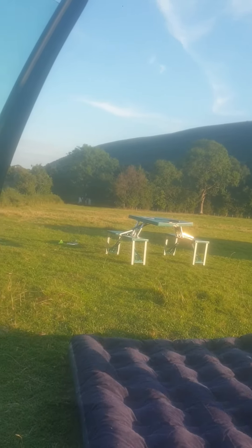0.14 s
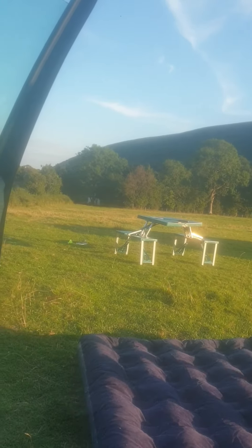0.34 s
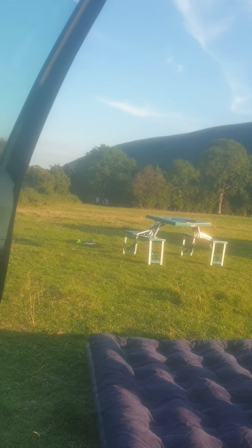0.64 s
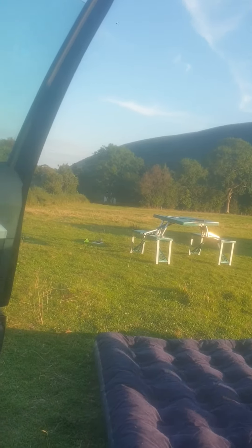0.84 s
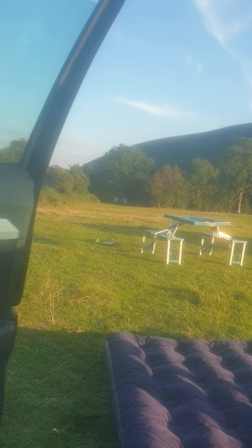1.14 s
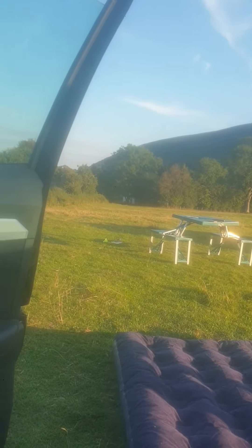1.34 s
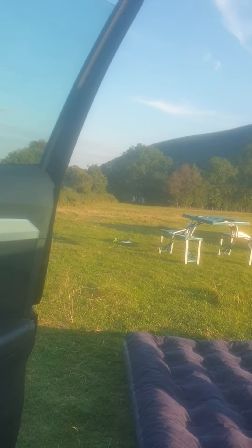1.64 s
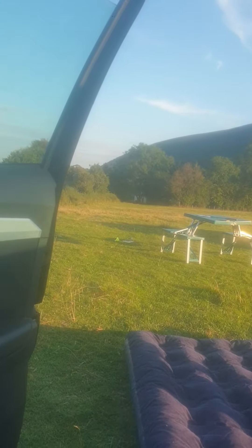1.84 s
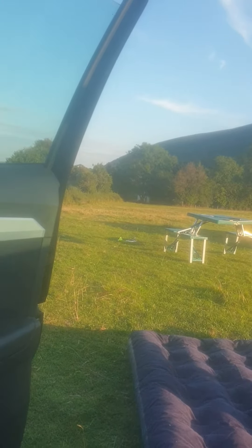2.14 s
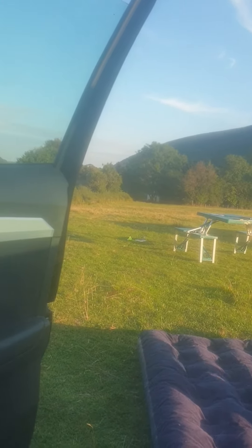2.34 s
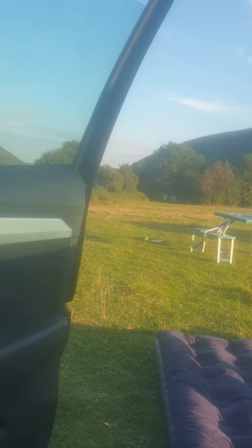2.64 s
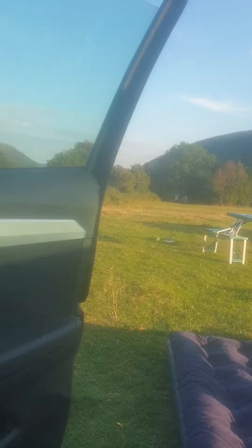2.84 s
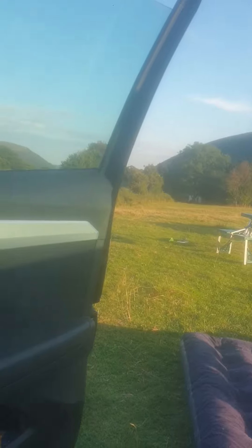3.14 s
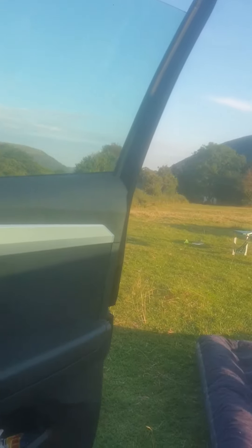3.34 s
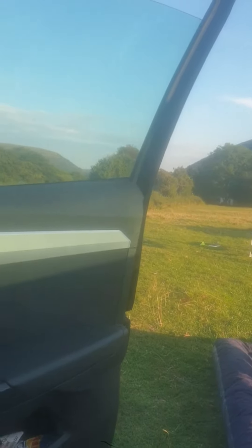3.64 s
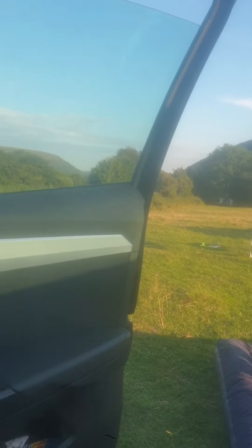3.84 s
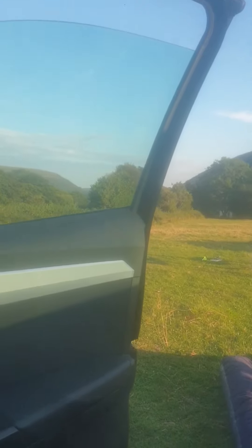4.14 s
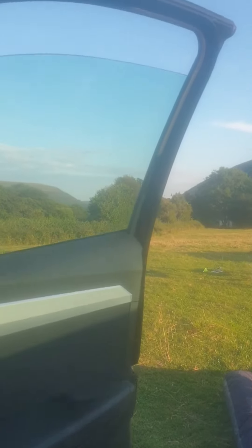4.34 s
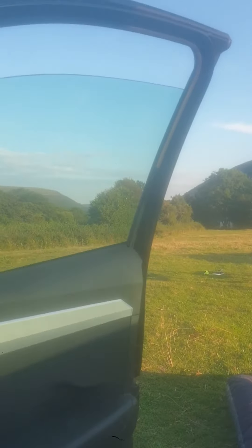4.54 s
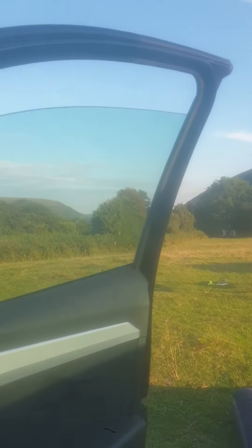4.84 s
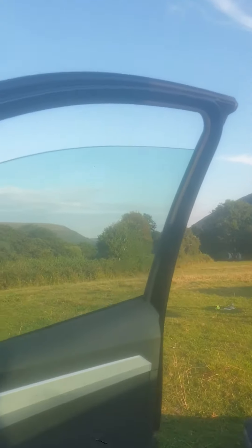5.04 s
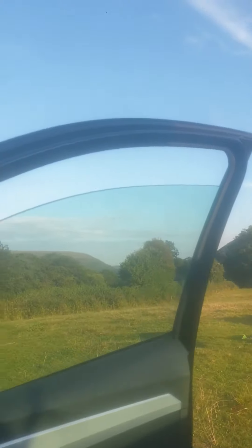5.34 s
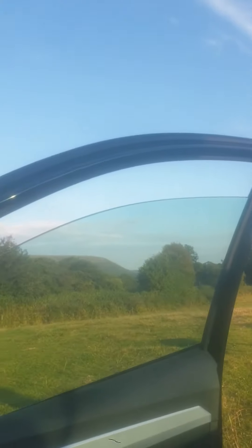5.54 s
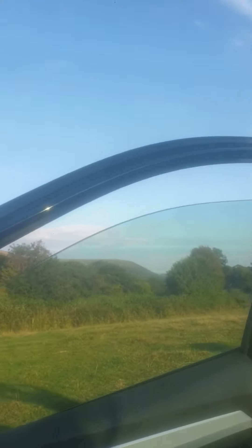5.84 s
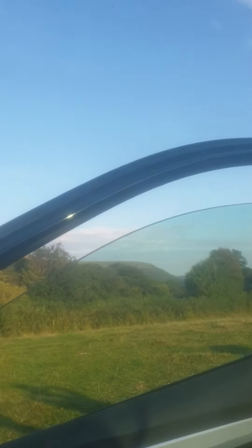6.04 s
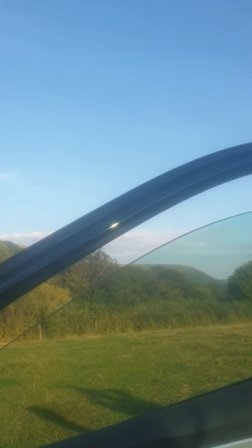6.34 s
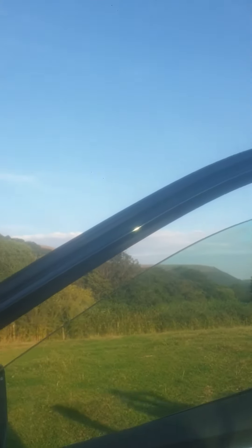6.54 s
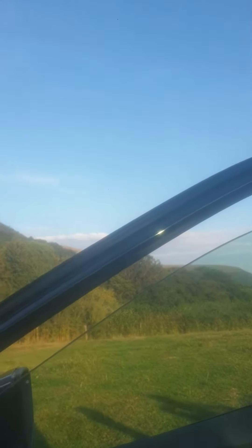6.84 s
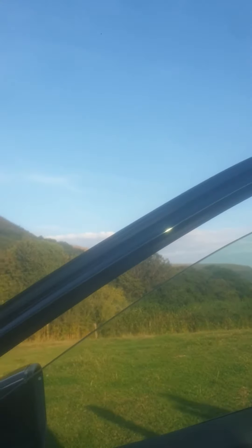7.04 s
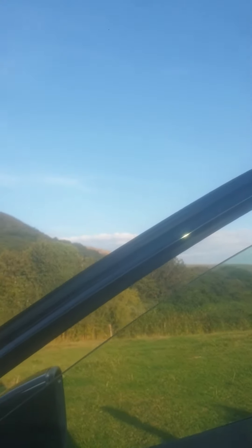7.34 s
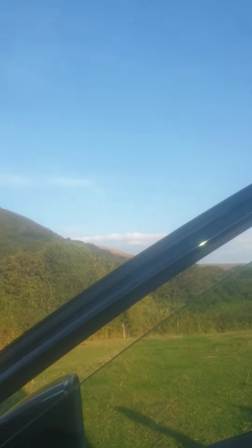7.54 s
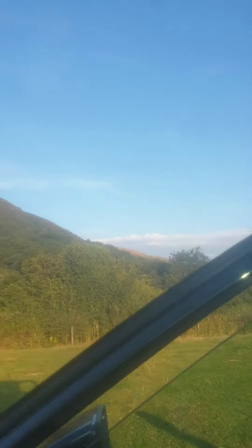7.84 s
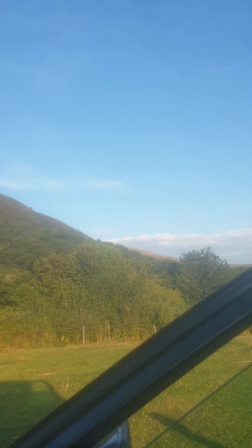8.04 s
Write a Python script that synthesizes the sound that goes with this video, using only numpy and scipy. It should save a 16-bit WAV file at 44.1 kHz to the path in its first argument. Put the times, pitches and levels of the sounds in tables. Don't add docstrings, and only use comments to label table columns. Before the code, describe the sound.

Continuous harsh droning of a mattress air pump in a meadow, rattling and whining, its colour changing halfway while air hisses.

```python
import sys
import numpy as np
from scipy import signal
from scipy.fft import rfft, irfft, next_fast_len
from scipy.io import wavfile
from scipy.ndimage import uniform_filter1d, map_coordinates

SR = 44100
rng = np.random.default_rng(int(sys.argv[2]) if len(sys.argv) > 2 else 0)


def gain_from_db(level_db):
    decades = np.asarray(level_db, float) / 20
    return 10 ** decades


def wrap_up_sound(samples):
    columns = np.atleast_2d(samples).T
    tamed = np.clip(columns, -1, 1)
    steps = np.round(tamed * 32767).astype(np.int16)
    wavfile.write(sys.argv[1], SR, steps)


N = 361179
T = np.arange(N) / SR
WHEEL, PINION = 82, 18
POSES = np.linspace(0, 3.5, 29)
ORDERS = np.arange(1, 201)


def unit(x):
    return x / np.sqrt(np.mean(x ** 2) + 1e-20)


def curves(rows):
    s, *cols = np.transpose(rows)
    return [np.interp(T, s, c) for c in cols]


def wobble(rate):
    knots = rng.standard_normal(int(N * rate / SR) + 4)
    coarse = T[::32]
    return unit(np.interp(T, coarse, map_coordinates(knots, [coarse * rate])))


def per_port(left_db, right_db):
    return gain_from_db([[left_db], [right_db]])


def pump():
    heading, delay_ms = phone_turn()
    turns = crank_turns()
    strokes = valve_strokes(turns, heading)
    turns = turns - np.array([[.016], [0]])
    bite = 2 * np.pi * (turns - .8) + 0.0032 * wobble(40)
    echoed = strokes + np.sqrt(2) * motor(turns) + air_noise(turns, heading)
    gears = np.sqrt(2) * (tooth_mesh(bite, heading) + high_whine(turns))
    return door(echoed, heading, delay_ms) + gears + hose_hiss(bite, heading)


# (time [s], heading [-], door echo delay [ms])
PHONE_TURN = [
    (0, 0, 2.57),
    (3.4, -0.12, 2.69),
    (4, 0.44, 2.48),
    (4.5, 0.3, 2.43),
    (4.95, 1, 2.31),
    (5.6, 1.24, 2.32),
    (6.2, 1.8, 2.227),
    (7, 2, 2.16),
    (7.6, 2.5, 2.17),
    (8.19, 3.5, 1.87),
]


def phone_turn():
    return curves(PHONE_TURN)


# (time [s], crank turns per second [Hz])
CRANK_SPEED = [(0, 84.5), (.45, 84.62), (.75, 84.4), (1.02, 84.57), (1.4, 84.29), (1.8, 84.5), (2.3, 84.36),
               (2.78, 84.3), (3.02, 84.46), (4, 84.49), (4.25, 84.38), (4.8, 84.36), (5.12, 84.47),
               (5.8, 84.24), (6.15, 84.39), (6.65, 84.44), (7.1, 84.32), (7.6, 84.46)]


def crank_turns():
    crank_hz, = curves(CRANK_SPEED)
    return np.cumsum(crank_hz + .05 * wobble(20)) / SR + 0.05 + .0008 * wobble(70)


def valve_strokes(turns, heading):
    pose = np.interp(heading, POSES, np.arange(len(POSES)))
    place = [pose, turns % 1 * 4096]
    strokes = [map_coordinates(port, place, order=1, mode="grid-wrap") for port in cycles()]
    return np.array(strokes) * gain_from_db(0.08 * wobble(84))


def cycles():
    phase = arrival_phase()
    lag = port_lag()
    lines = gain_from_db(order_levels() + field_spots()) * np.exp(1j * (phase + np.array([0 * lag, lag])))
    return irfft(np.pad(lines, ((0, 0), (0, 0), (1, 0))), 4096) * 4096 / np.sqrt(2)


STROKE_ARRIVAL = [(1.5, -.06), (2.5, 0), (3.5, -.26), (4.5, -.3), (5.5, .24), (6.5, .31), (7.5, .11),
                  (8.6, .3), (9.6, .33), (10.5, .6), (11.5, .28), (14, .07), (20, .42)]


def arrival_phase():
    k, heading = ORDERS, POSES[:, None]
    at, share = np.transpose(STROKE_ARRIVAL)
    spread = 0.26 * np.clip((k - 14) / 6, 0, 1) * (1 + (k > 33)) * rng.uniform(-1, 1, 200)
    twist = 0.46 * heading * np.clip((k - 6) / 2, 0, 1)
    return np.pi - 2 * np.pi * np.cumsum(np.interp(k - .5, at, share) + spread) - twist


PORT_LAG = [(1, 0), (5, 0.25), (13, 1.32), (20, 4), (23.4, 3), (25, 1.5), (30, 0.73), (38, -2.5),
            (49, 1.76)]


def port_lag():
    k, heading = ORDERS, POSES[:, None]
    oppose_rad, oppose_share = 3.3, .55
    lag = np.where(k < 50, np.interp(k, *np.transpose(PORT_LAG)), rng.uniform(0, 2 * np.pi, 200))
    turned_away = np.clip(heading - .9, 0, 1) * (heading < 2.9) * (k > 18) * (k < 33)
    return lag + (oppose_rad - lag) * oppose_share * turned_away


# (crank multiple
# [-], facing left [dB], facing right [dB], away left [dB], away right [dB])
STRONG_ORDERS = [(1, -32.5, -35, -34, -36.5), (2, -29.5, -32.5, -31.5, -34.5), (3, -53.5, -61, -48.5, -52),
                 (4, -44, -44.5, -42.5, -49.5), (5, -32, -33.5, -40.5, -40.5), (6, -19.5, -25, -24.5, -27),
                 (7, -20, -32.5, -23, -26), (8, -30, -30, -29, -39), (9, -32.5, -37, -35, -37.5),
                 (10, -28, -35, -33.5, -35), (11, -29.5, -37, -29, -35.5), (12, -31.5, -31, -28, -39),
                 (13, -28, -33, -27, -33), (14, -40, -43, -32, -40.5),
                 (15, -32.5, -38, -35.5, -37), (20, -42.5, -40, -37.5, -43), (21, -44.5, -38, -38.5, -44.5),
          (22, -46, -44.5, -32, -39), (23, -41, -33.5, -45, -34), (25, -31, -31.5, -47, -41),
          (26, -40, -47.5, -57.5, -51.5), (28, -51, -41, -37, -43), (29, -42, -46, -43, -35.5),
          (30, -35.5, -41, -43, -49), (34, -44, -44, -44, -48), (38, -42, -48, -40.5, -55),
          (41, -51, -51.5, -45, -52), (49, -38, -48, -46, -54)]
# (crank multiple [-], left level [dB], right level [dB])
RATTLE_LEVELS = [(15, -44, -45.5), (19.2, -43.5, -54), (27, -62, -47.5), (32.3, -58.5, -48),
                 (36.8, -55.5, -58), (56.2, -57.5, -63), (59.3, -61, -69.5), (196, -90.5, -99)]


def order_levels():
    heading = POSES[:, None]
    scatter_db, reshuffle_db = 2.5, 4
    at, *rattle = np.transpose(RATTLE_LEVELS)
    drift = uniform_filter1d(rng.standard_normal((2, len(POSES), 200)), size=5, axis=1)
    db = np.array([np.interp(ORDERS, at, r) for r in rattle])[:, None]
    db = db + scatter_db * rng.standard_normal((2, 1, 200)) + reshuffle_db * unit(drift)
    at, *sides = np.transpose(STRONG_ORDERS)
    facing, away = np.reshape(sides, (2, 2, 1, -1))
    db[..., np.round(at).astype(int) - 1] = facing + (away - facing) * np.clip(heading / 2, 0, 1)
    return db


# (heading [-], centre [Hz], width [Hz], left gain [dB], right gain [dB])
FIELD_SPOTS = [(0.88, 338, 35, -23, -16), (1.55, 338, 40, -4, -18), (.6, 590, 44, 3, 4),
               (1.1, 1006, 90, -9, 0), (0.8, 1100, 60, 2, 7), (1.6, 1150, 220, -6.5, -5),
               (3.2, 460, 86, -9, -7), (3.22, 338, 51, 6.5, 9.5), (3, 700, 70, 6, 0),
               (3.07, 1040, 140, -6, 6), (0.62, 2590, 160, -9, 10), (3.2, 2400, 50, 10, -7),
               (1.2, 1940, 58, 9.5, 0), (1.2, 3380, 230, 4, -6), (1.9, 3460, 50, 8, -6),
               (2.3, 2600, 40, 8, -10), (0.67, 4600, 150, 6, 14), (3.24, 4540, 380, 10.5, 11),
               (1.75, 4140, 40, 11, 0), (2.2, 4140, 40, 3, 0), (.7, 4140, 40, -6, -3),
               (3.2, 2800, 170, -6, -10), (3.18, 2400, 90, -8, -9), (1.03, 590, 74, 1, 3)]


def field_spots():
    heading, line_hz = POSES[:, None], ORDERS * CRANK_SPEED[0][1]
    db = 0
    for where, hz, width_hz, left, right in FIELD_SPOTS:
        nearness = np.exp(-((heading - where) / .36) ** 2 - ((line_hz - hz) / width_hz) ** 2)
        db = db + np.reshape([left, right], (2, 1, 1)) * nearness
    return db


# (shaft multiple [-], left level [dB], right level [dB])
MOTOR_LINES = [(1, -61, -56.5), (3, -44, -49.5), (4, -46, -52), (5, -68, -67), (6, -53, -53), (8, -56, -60)]


def motor(turns):
    shaft = 2 * np.pi * turns * WHEEL / PINION
    return sum(per_port(l, r) * gain_from_db(1.2 * wobble(6.0)) * np.sin(k * shaft) for k, l, r in MOTOR_LINES)


# (crank multiple [-], left level [dB], right level [dB])
TOOTH_LINES = [(71.1, -49, -64), (81.4, -51, -69), (82, -43, -57), (82.52, -45.5, -69), (84.4, -55, -75),
               (83, -54, -69), (89, -62, -66)]


def tooth_mesh(bite, heading):
    away = np.clip(1.9 * heading, 0, 1)
    back_db = 4 * np.clip(4 * heading - 8, 0, 1)
    shade = gain_from_db(-8 * away + back_db + 1.5 * away * wobble(2.61))
    return shade * sum(per_port(l, r) * np.cos(round(k) * bite) for k, l, r in TOOTH_LINES)


# (crank multiple [-], left level [dB], right level [dB])
WHINE_LINES = [(119.7, -56, -70), (130, -62, -72), (146, -62, -69), (164, -53, -58), (165, -57, -62)]


def high_whine(turns):
    smooth = 2 * np.pi * uniform_filter1d(turns, size=1500, axis=1)
    return sum(per_port(l, r) * gain_from_db(1.7 * wobble(2.7)) * np.cos(round(k) * smooth) for k, l, r in WHINE_LINES)


# (frequency [Hz], left level [dB per Hz], right level [dB per Hz])
HISS_SPECTRUM = [(2980, -90, -99), (6100, -82.5, -90), (7200, -76, -87), (7460, -77, -90),
                 (8030, -93, -93.5), (9470, -81, -92), (10200, -78.5, -94), (10800, -77, -92.5),
                 (12200, -78, -85), (13400, -77.5, -89), (14000, -79, -85), (14700, -78, -82),
                 (15500, -82, -84), (15720, -86, -92)]


def hose_hiss(bite, heading):
    leak_heading, span = 2.18, 0.14
    hiss_db = 0.78 * heading + 3 * np.exp(-((heading - leak_heading) / span) ** 2)
    return gain_from_db(hiss_db) * (1 + 0.14 * np.cos(bite)) * noise(HISS_SPECTRUM, patchy_db=1.6)


# (frequency [Hz], left level [dB per Hz], right level [dB per Hz])
AIR_SPECTRUM = [(45.3, -80, -68.5), (298, -83.5, -77), (547, -67, -73.5), (780, -66, -76),
                (1090, -65.5, -77), (1520, -69, -66.5), (1870, -83, -80.5), (2040, -65, -63),
                (2410, -81.5, -81), (2620, -68, -71.5), (3800, -72.5, -89.5), (4180, -67, -75),
                (5340, -74, -79.5), (9100, -100, -99)]


def air_noise(turns, heading):
    pulse = 1 + 0.046 * np.cos(2 * np.pi * (turns - .3))
    return pulse * gain_from_db(-.4 * heading + 1.0 * wobble(2.1)) * noise(AIR_SPECTRUM, patchy_db=-0.13)


# (frequency [Hz], likeness [0-1])
LIKENESS = [(30, 0.61), (300, 0.48), (1500, 0.79), (2500, 0.22), (5000, 0.24), (12000, 0.2)]


def noise(spectrum, patchy_db):
    size = next_fast_len(N)
    z = signal.stft(rng.standard_normal((2, N + 512)), nperseg=512)[2]
    field = uniform_filter1d(rng.standard_normal(z.shape[1:]), size=6, axis=0)
    field = uniform_filter1d(field, size=14, axis=1)
    patchy = signal.istft(z * gain_from_db(patchy_db * unit(field)), nperseg=512)[1][:, :N]
    a, b = rfft(unit(patchy), size)
    log_f = np.log(np.fft.rfftfreq(size, 1 / SR) + 1)
    f, *db = np.transpose(spectrum)
    gain = gain_from_db([np.interp(log_f, np.log(f), d, right=-140) for d in db]) * np.sqrt(SR / 2)
    hz, share = np.transpose(LIKENESS)
    alike = np.clip(np.interp(log_f, np.log(hz), share), 0, 1)
    return irfft(gain * [a, alike * a + np.sqrt(1 - alike ** 2) * b], size)[:, :N]


def door(x, heading, delay_ms):
    bright = signal.sosfilt(signal.butter(2, 900, "high", fs=SR, output="sos"), x)
    paths = (.49, 1)
    late = [np.interp(T - delay_ms * share / 1000, T, b) for b, share in zip(bright, paths)]
    echo_db = -11 + 1.7 * heading + np.array([[-.8], [0]])
    return x + gain_from_db(echo_db) * np.array(late)


# (time [s], pitch [Hz], length [s], level [dB])
GRIP_SHIFTS = [
    (.74, 250, .025, -41),
    (.74, 110, .04, -44),
    (5.4, 330, .07, -44),
    (5.9, 55, .08, -46),
]


def hand():
    total = 0
    for s, hz, length, db in GRIP_SHIFTS:
        after = T - s
        swell = np.exp(-(after / length) ** 2 * 4)
        angle = 2 * np.pi * hz * after * (1 + .4 * after) + 1.1 * wobble(50)
        total = total + gain_from_db(db) * swell * np.sin(angle)
    return total


# (frequency [Hz], unsteadiness [Hz], level [dB])
ENGINE_LINES = [
    (30.8, .5, -56),
    (55.5, 4, -59),
]


def car():
    total = 0
    for hz, unsteady_hz, db in ENGINE_LINES:
        level = np.sqrt(2) * gain_from_db(db + wobble(5.9))
        angle = 2 * np.pi * np.cumsum(hz + unsteady_hz * .3 * wobble(8.9)) / SR
        total = total + level * np.sin(angle)
    return total


def scene():
    return pump() + hand() + car()


def band_limit(x):
    return signal.sosfilt(signal.butter(12, 16490, fs=SR, output="sos"), x)


def record(dry):
    band = irfft(rfft(dry) * (np.fft.rfftfreq(N, 1 / SR) < 15750), N)
    return band_limit(band)


dry = scene()
out = record(dry)
wrap_up_sound(out)
```